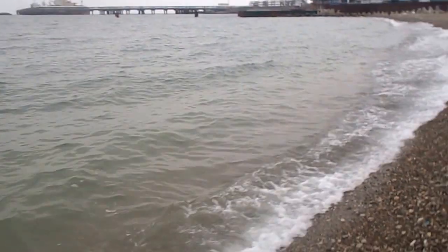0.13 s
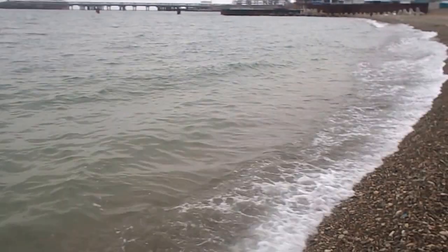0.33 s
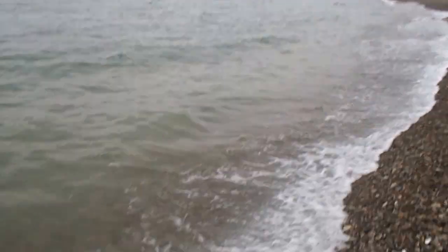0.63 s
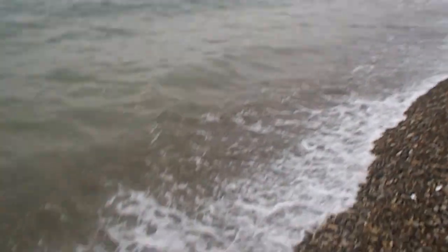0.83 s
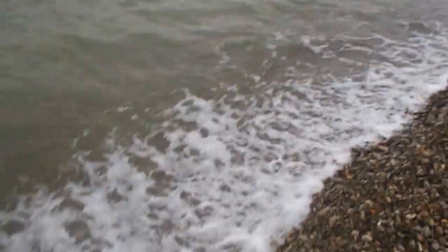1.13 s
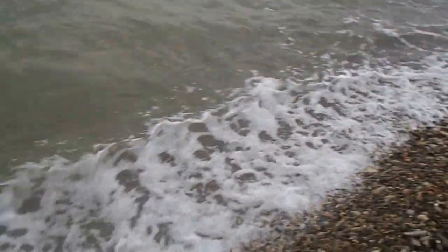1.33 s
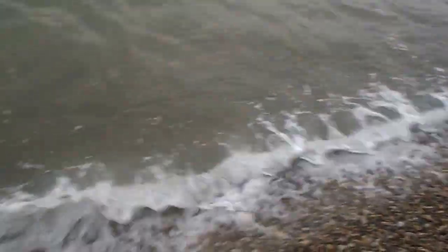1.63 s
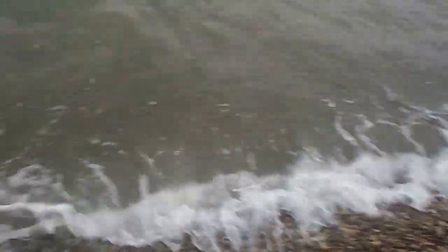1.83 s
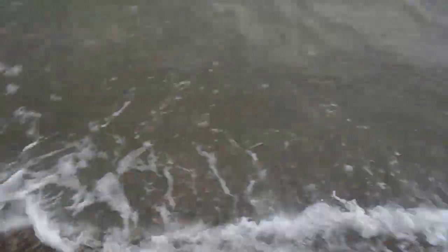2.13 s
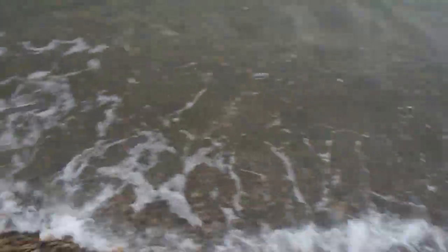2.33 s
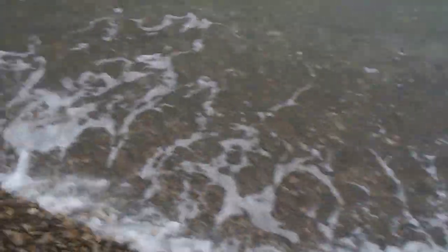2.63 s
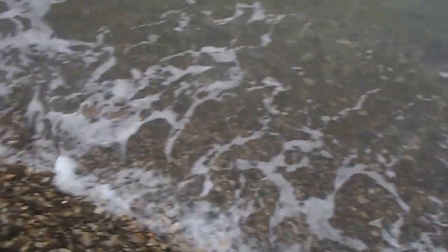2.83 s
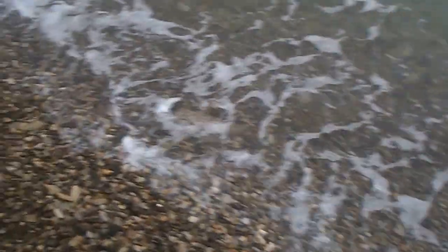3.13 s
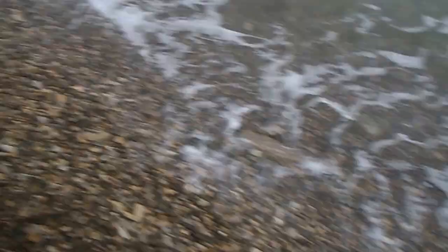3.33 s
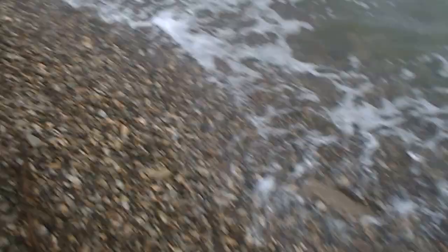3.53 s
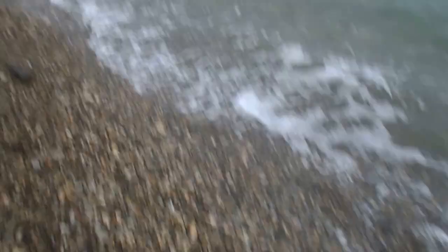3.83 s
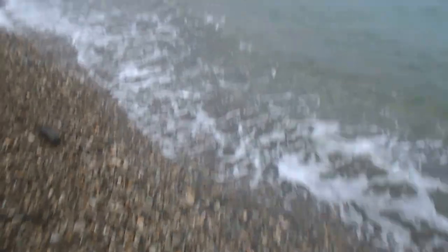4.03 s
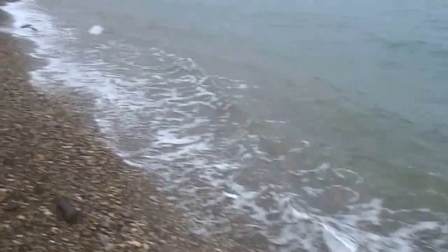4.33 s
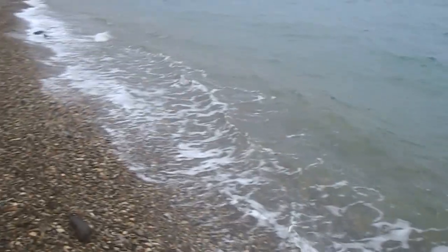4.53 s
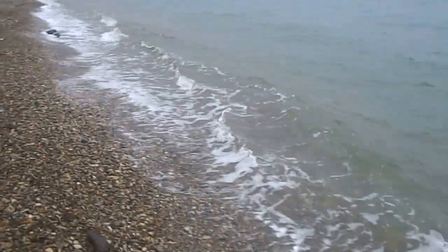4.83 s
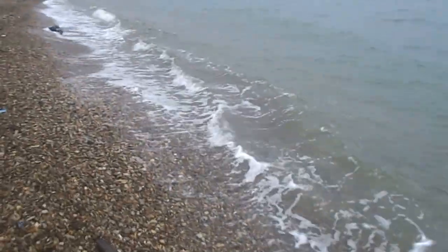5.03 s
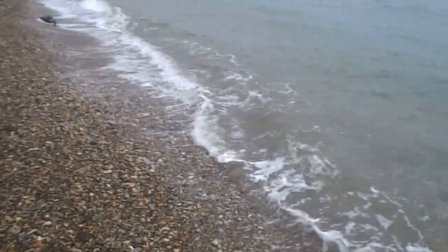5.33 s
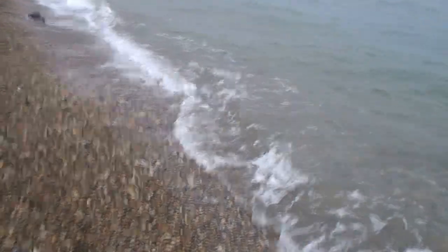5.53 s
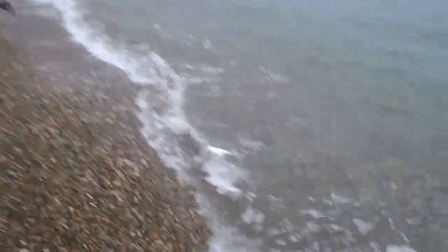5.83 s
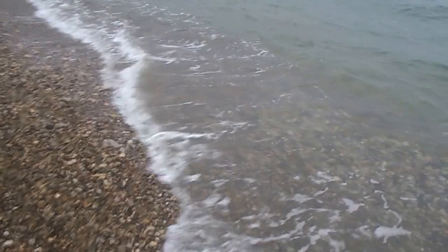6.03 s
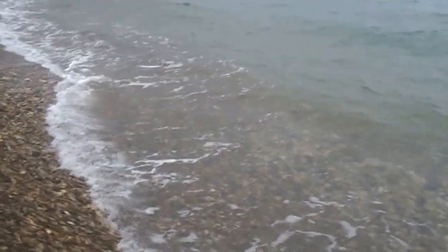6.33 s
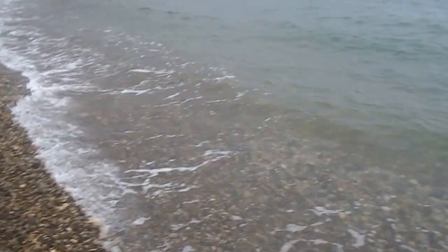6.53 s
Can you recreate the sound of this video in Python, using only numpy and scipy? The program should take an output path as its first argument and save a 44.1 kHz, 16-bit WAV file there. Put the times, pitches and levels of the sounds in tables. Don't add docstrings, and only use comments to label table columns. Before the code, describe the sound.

Close surf on shingle, outdoors: a splashing wash with low wind buffets first, then a quieter lull of foam hiss, gurgles and pebble ticks. Deep glugs mark the backwash, wind rumble returns, and a fresh wave crashes with a sharp clatter of stones before easing. Dry, nearly mono sound from a small camera microphone.

```python
import sys
import numpy as np
from scipy import signal
from scipy.fft import rfft, irfft
from scipy.io import wavfile
from scipy.ndimage import uniform_filter1d

SR = 44100
rng = np.random.default_rng(int(sys.argv[2]) if len(sys.argv) > 2 else 0)


def decibels_to_gain(level_db):
    exponent = np.asarray(level_db, float) / 20
    return 10 ** exponent


def transcribe(u):
    v = np.clip(np.atleast_2d(u).T, -1, 1)
    q = np.round(v * 32767).astype(np.int16)
    wavfile.write(sys.argv[1], SR, q)


N = 294588

# frequency_hz, level_db
SPRAY = [(5000, -33), (6800, -1.5), (7700, -0.5), (9300, -4), (10700, 3), (11200, -7), (11500, -16),
         (11800, -30)]


def evened(x):
    return x / np.sqrt(np.mean(x ** 2) + 1e-20)


def add(mix, s, sound):
    part = mix[max(round(s * SR), 0):][:len(sound)]
    part += sound[:len(part)]


def add_centred(mix, s, sound):
    half = len(sound) // 2
    add(mix, s - half / SR, sound[max(half - round(s * SR), 0):])


def column(rows, index):
    rows = np.array(rows)
    return np.interp(np.arange(N) / SR, rows[:, 0], rows[:, index])


def coloured(x, points):
    f, db = np.transpose(points)
    hz = np.fft.rfftfreq(len(x), 1 / SR)
    gain = decibels_to_gain(np.interp(np.log(hz + 1), np.log(f), db, -120, -120))
    return evened(irfft(rfft(x) * gain, len(x)))


def gliding(x, points, factor, size=512):
    f, db = np.transpose(points)
    hz, t, z = signal.stft(x, SR, nperseg=size)
    stretch = np.clip(np.interp(t, np.arange(N) / SR, factor), .4, 2.5)
    gain = decibels_to_gain(np.interp(np.log(hz[:, None] / stretch + 1), np.log(f), db))
    filtered = signal.istft(z * gain, SR, nperseg=size)[1][:N]
    level = np.sqrt((gain[hz < 6000] ** 2).mean(0))
    return filtered / np.interp(np.arange(N) / SR, t, level)


def flutter(top_hz):
    return coloured(rng.standard_normal(N), [(3, 0), (top_hz, -12), (3 * top_hz, -60)])


def patchy(patch_db, size=512):
    frames = 4 * N // size + 5
    a, b, patches = rng.standard_normal((frames, size // 2 + 1, 3)).T
    patches = uniform_filter1d(patches, size=6, axis=0)
    patches = evened(uniform_filter1d(patches, size=16, axis=1))
    z = (a + 1j * b) * decibels_to_gain(patch_db * patches)
    return evened(signal.istft(z, nperseg=size, noverlap=3 * size // 4)[1][:N])


def pops(per_s, spread_db):
    size_db = spread_db * np.minimum(rng.exponential(1, N), 4.2)
    clicks = decibels_to_gain(size_db) * rng.choice([-1., 1.], N)
    return evened(clicks * (rng.random(N) < per_s / SR))


def ring(hz, t60, glide, rise):
    t = np.arange(int(max(t60, .005) * SR)) / SR
    tone = np.sin(2 * np.pi * hz * (t + glide * t ** 2 / t60))
    return tone * decibels_to_gain(-60 * t / t60) * (1 - np.exp(-t / rise))


def froth(per_s, low_hz, high_hz, cycles, count=16):
    out, births, kind = np.zeros(N), pops(per_s, 1.95), rng.integers(0, count, N)
    for k, hz in enumerate(np.geomspace(low_hz, high_hz, count)):
        bubble = ring(hz, 2 * cycles / hz, 0.23, .5 / hz)
        bubble = evened(bubble) / np.sqrt(len(bubble))
        out += signal.oaconvolve(births * (kind == k), bubble)[:N]
    return evened(out)


def echoed(x):
    # time_s, first_notch_hz, share
    slope_echo = [
        (0, 2300, 0.018),
        (2.4, 2280, 0.017),
        (2.8, 2020, 0.12),
        (3.3, 2080, 0.2),
        (4.0, 2230, 0.27),
        (4.45, 2680, 0.064),
        (4.7, 2806, 0.019),
        (6.68, 2810, 0.022),
    ]
    share = np.clip(column(slope_echo, index=2), 0, .9)
    late = np.interp(np.arange(N) - SR / column(slope_echo, index=1), np.arange(N), x)
    return (x - share * late) / np.sqrt(1 + share ** 2)


def surf():
    # time_s, force_db, foam_db (re force), trapped_air_db (re force),
    # bubble_pitch_factor, air_pocket_pitch_factor
    water = [(0.0, -22, 0.5, -8.5, 0.84, 0.87), (.45, -24, -1.5, -8, 0.8, 0.87),
             (.91, -22.5, -8.5, -9.5, 1.11, 0.99), (1.1, -27.5, -6, -2.5, 1.07, 1.15),
             (1.42, -31.5, -1, -3, 0.95, 1.24), (1.78, -31, 6.5, -4.5, 1.16, 0.99),
             (2.12, -27, -2.5, -1.5, 0.86, 1.02), (2.46, -33.5, -2, -9, 1, 0.76),
             (2.86, -37, 5, -1, 0.94, 0.99), (3.18, -36, 6, 0, 0.89, 1.2),
             (3.45, -32.5, 3, 2.5, 0.81, 0.88), (4.05, -31, 2.5, 3, 0.99, 1.06),
             (4.28, -26.5, 5, -4, 0.85, 0.55), (4.61, -33, -0.6, 2, 0.76, 1.12),
             (5.15, -30.5, -1, -2.5, 0.85, 1.065), (5.9, -22.5, -1, -8.5, 1.07, 1.05),
             (6.17, -27.5, -6, -9.5, 1.1, 0.92), (6.68, -31, -1.5, -7, 1, 1.5)]
    # time_s, finest_mist_db
    mist_curve = [(0, 0.5), (.9, -2), (1.3, -1), (1.75, -3), (2.2, 2.5), (2.9, -2.5), (3.45, -1.5),
                  (4.1, -0.5), (4.75, -2.5), (5.0, 3), (5.45, 1), (5.56, 6.5), (5.9, 1), (6.0, -4),
                  (6.2, 7), (6.68, 0)]
    # frequency_hz, level_db
    gurgle_spectrum = [(40, -45), (120, -44), (280, -5), (500, -2.5), (800, -5), (1300, -19.5),
                       (3000, -39.5)]
    roar_spectrum = [(200, -47), (650, -8), (1000, -5), (1400, -4), (2000, -5), (3200, -9.5), (7000, -29.5)]
    fizz_spectrum = [(700, -15.5), (1800, -6.5), (2600, -5), (3400, -5), (5000, -4), (9000, -2.5)]
    fizz_rolloff = [(100, -1.5), (4300, -2), (5500, -6.5), (6500, -13.5), (7300, -31), (8000, -42)]

    shared = flutter(106)
    force_db, foam_db, air_db = (column(water, index=i) for i in (1, 2, 3))
    fine = np.clip(column(water, index=4), .5, 2)
    pocket = column(water, index=5)

    gurgle = patchy(2.6, size=1024) + 0.32 * froth(900, 202.2, 1414, 5.0)
    gurgle = evened(gliding(gurgle, gurgle_spectrum, pocket, size=1024))
    roar = patchy(2.34) + .5 * froth(3000, 620.0, 5030, 9.2)
    roar = evened(gliding(roar, roar_spectrum, fine))

    crackle = pops(2500, 3.8)
    fizz_pitch = 1 + 0.35 * foam_db
    fizz = gliding(patchy(1.2) + 0.67 * crackle, fizz_spectrum, fizz_pitch)
    fizz = coloured(fizz, fizz_rolloff)

    spray = coloured(patchy(1.6) + .8 * crackle, SPRAY)
    mist = irfft(rfft(spray) * (np.fft.rfftfreq(N, 1 / SR) > 10000), N)
    spray = spray + (decibels_to_gain(column(mist_curve, index=1)) - 1) * mist
    spray_db = -42.5 + 1.27 * (force_db + 28) + 1.16 * foam_db

    reflected = decibels_to_gain(force_db + 0.11 * shared) * roar
    reflected = reflected + decibels_to_gain(force_db + foam_db + 0.78 * shared) * fizz
    return (decibels_to_gain(force_db + air_db + 0.46 * shared) * gurgle
            + echoed(reflected)
            + decibels_to_gain(spray_db + 1.8 * shared) * spray)


def stones():
    # start_s, peak_db, pitch_hz, spray_db (relative)
    impacts = [(1.0184, -14, 4460, -29), (1.0524, -18, 3200, -29), (1.056, -14, 4800, -24),
               (1.0678, -16.5, 4040, -19), (1.123, -15, 4500, -33), (1.1304, -22, 5360, -27),
               (1.1744, -18, 4500, -30), (1.3326, -25, 3390, -15), (.924, -20, 4730, -30),
               (1.212, -32, 4700, -28), (1.265, -33, 4900, -28), (1.344, -23, 4670, -28),
               (1.8325, -23, 4410, -31), (1.899, -17, 3060, -16), (2.2642, -13.5, 3650, -19),
               (2.3085, -16.5, 4740, -32), (2.3553, -24, 2950, -22), (2.5942, -21, 4190, -30),
               (2.6094, -20, 3800, -26), (2.658, -20, 4500, -26), (3.354, -16, 3540, -16),
               (3.384, -18, 3690, -25), (3.3992, -22, 3700, -21), (3.407, -12, 3930, -26),
               (4.9272, -26, 4250, -13), (6.2664, -10, 4070, -22), (6.2924, -10, 3860, -23),
               (6.309, -12, 4400, -16)]
    out, t = np.zeros(N), np.arange(4096) / SR
    t60_s, rise_s = 0.02, 0.0019
    for s, db, hz, rel_db in impacts:
        noise = rng.standard_normal(4096)
        clack = coloured(noise, [(.5 * hz, -30), (.8 * hz, -8), (.92 * hz, -1),
                                 (1.08 * hz, -1), (1.25 * hz, -12), (1.6 * hz, -34)])
        spit = decibels_to_gain(rel_db + 7.5) * coloured(noise, SPRAY)
        envelope = decibels_to_gain(db - 3.0 - 60 * t / t60_s) * (1 - np.exp(-t / rise_s)) ** 2
        add(out, s, envelope * 2 * (clack + spit))
    return out


def raked_stones():
    # peak_s, level_db, rise_s, fall_t60_s
    handfuls = [(2.15, -30.5, .06, 0.49), (2.594, -22.5, 0.024, 0.36), (2.672, -26.5, 0.015, 0.23),
                (3.405, -26, 0.024, 0.14), (3.52, -30, 0.06, 0.4), (4.21, -39, 0.012, 1),
                (4.36, -27.5, 0.082, 0.74), (4.932, -24.5, 0.013, 0.18), (4.962, -24.5, 0.019, 0.19),
                (5.258, -30, 0.032, 0.21), (6.256, -27, 0.006, 0.45), (6.296, -25.5, 0.0091, 0.17),
                (6.314, -26, 0.0048, 0.39), (6.268, -28, .004, .08), (4.43, -35.5, .04, 0.26),
                (1.125, -32, .002, .04), (2.268, -33, .003, .05), (5.88, -36, .04, 0.25),
                (0.61, -28, 0.04, 0.56), (3.2, -34.5, .06, .8), (5.17, -35, 0.047, .5),
                (5.64, -25.5, 0.083, 1.8), (6.36, -31, .03, 1.6), (0.095, -23.5, .06, 0.67)]
    # frequency_hz, level_db
    grit_spectrum = [(300, -9), (1000, -2.5), (2500, -3), (4200, 0), (5500, -1), (6600, -6.5),
                     (7700, -13.5), (10700, -14), (11500, -26), (11800, -70)]
    t, heap = np.arange(N) / SR, np.zeros(N)
    for s, db, rise, t60 in handfuls:
        rise_db = -8.7 * np.minimum((t - s) / rise, 9) ** 2
        fall_db = -60 * (t - s) / t60
        heap += decibels_to_gain(db + np.where(t < s, rise_db, fall_db).clip(-150))
    grit = coloured(rng.standard_normal(N) + 0.64 * pops(2500, 3.0), grit_spectrum)
    return heap * decibels_to_gain(1.84 * flutter(70)) * echoed(grit)


def bubbles():
    # start_s, peak_db, pitch_hz
    air_pockets = [(0.35, -11, 1196), (.419, -12, 1140), (.549, -9, 1100), (.871, -13, 1430),
                   (1.832, -15, 2100), (1.92, -14, 415), (2.063, -11, 700), (2.092, -16, 605),
                   (2.194, -13, 596), (3.247, -12, 620), (3.32, -10, 884), (3.389, -10.5, 560),
                   (3.505, -11.5, 1180), (3.639, -8, 413), (5.131, -15, 680),
                   (2.0368, -14, 2987),
        (2.1294, -16, 3630),
        (2.1919, -19, 1620),
        (2.244, -14, 1690),
                   (0.6194, -18, 1360),
        (0.685, -13, 1870),
        (0.7594, -15, 1350),
        (0.82, -11, 1650),
        (0.9294, -24, 1630),
        (5.811, -12, 1690),
        (5.8794, -11, 1570),
        (5.9294, -17, 1650),
                   (3.673, -16, 670),
        (3.846, -29, 482),
        (3.895, -12, 308),
        (4.046, -14, 695),
    ]
    out = np.zeros(N)
    for s, db, hz in air_pockets:
        add(out, s, decibels_to_gain(db - 3.0) * ring(hz, 0.038, 0.055, 0.0021))
    return out


def drops():
    # start_s, peak_db, pitch_hz
    pings = [(.269, -13, 2930), (.272, -19, 4170), (.433, -20, 2580), (.787, -22, 5510), (.91, -21, 5600),
             (1.131, -23, 5355), (1.174, -23, 4650), (1.211, -33, 5170), (1.264, -32, 5270),
             (1.398, -26, 4480), (1.469, -23, 4850), (1.578, -22, 4820), (1.769, -21, 4940),
             (2.074, -22, 3820), (2.181, -26, 5320), (2.191, -18, 3600), (2.215, -23, 4130),
             (2.265, -21, 3960), (2.316, -22, 3790), (2.353, -27, 5010), (2.583, -20, 5690),
             (2.594, -16, 4130), (2.957, -26, 3270), (3.002, -26, 3270), (3.215, -19, 4345),
             (3.287, -20, 2760), (3.59, -15, 3250), (3.899, -16, 3100), (4.276, -14, 3122),
             (4.421, -22, 5690), (4.472, -26, 5360), (4.634, -25, 3790), (4.807, -28, 4480),
             (4.876, -27, 3620), (4.932, -18, 5910), (5.052, -28, 3790), (5.09, -26, 4500),
             (5.622, -22, 5860), (6.107, -21, 3100), (6.296, -15, 4100), (6.313, -16, 4250),
             (6.268, -17, 3180), (1.068, -20, 3900), (6.639, -20, 4130)]
    out = np.zeros(N)
    for s, db, hz in pings:
        add(out, s, decibels_to_gain(db) * ring(hz, 0.02, 0.034, 0.00057))
    return out


def splashes():
    # centre_s, level_db, pitch_hz, half_length_s
    splash_bursts = [(0.075, -31, 780, .03), (.185, -26, 850, 0.023), (.37, -31, 1150, .025),
                     (0.76, -31.5, 4100, .03), (.85, -29, 1400, 0.042), (2.13, -26.5, 2450, .015),
                     (2.332, -33, 1350, .03), (2.49, -37, 510, 0.072), (2.953, -38, 2700, .06),
                     (3.07, -42, 2000, .05), (3.572, -34, 1330, .05), (3.556, -33, 2750, .06),
                     (3.698, -36, 430, .05), (3.841, -34, 2800, 0.089), (3.827, -36, 1450, 0.044),
                     (4.271, -35, 3000, .05), (4.793, -37.5, 1900, 0.08), (5.26, -29, 3200, 0.03),
                     (5.399, -36, 3100, .03), (5.54, -34, 340, .025), (5.801, -31, 4200, .07),
                     (5.882, -34, 1700, .04), (6.298, -34, 4000, 0.022), (6.343, -33, 910, 0.036),
                     (6.4, -31, 1000, .03), (6.557, -37, 900, 0.048), (6.154, -35, 220, 0.023),
                     (6.58, -37.5, 160, .04), (3.405, -24, 4500, .007), (6.27, -30, 2000, .008),
                     (6.295, -32, 1640, .012), (6.315, -34, 3300, .012), (.1, -33, 390, 0.085),
                     (.06, -34, 270, .06), (0.232, -28, 2200, .015), (1.0, -39, 500, 0.063), (2.9, -34, 500, .04),
                     (3.8, -36, 320, 0.11), (4.42, -36, 146, 0.05), (3.9, -35, 4600, .07), (4.2, -37, 3100, .04),
                     (5.4, -32, 2300, .03), (6.1, -32.5, 246, .04), (2.0, -38.5, 169, .1), (2.7, -40, 200, .05),
                     (1.06, -32, 5000, .01), (.76, -41, 70, .03), (4.0, -38, 380, .04), (5.45, -33, 270, .025),
                     (3.1, -40, 230, .04),
                     (3.408, -24, 4400, .003), (3.387, -28, 3800, .005), (3.407, -25, 750, .004),
             (6.252, -29, 4500, .004), (6.281, -25, 4300, .007), (6.283, -27, 1700, .008),
             (6.316, -24, 3900, .007), (6.343, -26, 4300, .004), (1.897, -29, 1200, .006),
             (1.837, -27, 1900, .006), (2.193, -28, 3300, .004), (.205, -27, 1500, .012),
             (.2, -29, 3500, .015), (1.8, -33, 3000, .05), (6.3, -29, 4800, .02), (3.29, -35, 5500, .03),
             (2.07, -31, 290, .07), (1.935, -33, 650, .02), (.645, -27, 1050, .02), (.3, -28, 950, .015),
             (5.9, -33, 1900, .06), (6.12, -35, 105, .04), (5.64, -34, 105, .04), (3.265, -33, 800, .035),
             (.88, -32, 1850, .06), (3.88, -36, 450, .15), (3.555, -33, 4500, .012)]
    out, t = np.zeros(N), np.arange(-8192, 8192) / SR
    w = 1.2
    for s, db, hz, half in splash_bursts:
        band = coloured(rng.standard_normal(len(t)), [(hz / w ** 3, -40), (hz / w, -3), (hz, 0),
                                                      (hz * w, -3), (hz * w ** 3, -40)])
        add_centred(out, s, decibels_to_gain(db) * band * np.exp(-(t / half) ** 2))
    return out


def spits():
    # start_s, peak_db
    beads = [(1.7057, -34), (1.802, -31), (1.9691, -32), (2.1103, -34), (2.2221, -34), (2.5134, -42),
             (2.8955, -36), (3.0068, -41), (3.143, -38), (3.2318, -35), (3.2632, -29), (3.2911, -36),
             (3.4034, -28), (3.5455, -35), (3.613, -37), (4.1377, -34), (4.1981, -30), (4.3238, -31),
             (4.455, -32), (4.8975, -39), (5.2327, -30), (5.5709, -29), (6.1367, -34), (6.2514, -30)]
    out, t = np.zeros(N), np.arange(2048) / SR
    t60_s, rise_s = .014, .0004
    for s, db in beads:
        envelope = decibels_to_gain(db - 60 * t / t60_s) * (1 - np.exp(-t / rise_s))
        add(out, s, envelope * coloured(rng.standard_normal(len(t)), SPRAY))
    return out


def wind():
    # time_s, level_db, eddy_pitch_hz
    eddies = [(0.0, -27, 243), (.2, -28.5, 248.4), (.24, -38, 200), (.72, -36, 172), (.82, -40.5, 234.2),
              (1.45, -46.5, 226), (1.86, -37.5, 215.4), (2.08, -36.5, 241), (2.5, -45, 236.8),
              (3.5, -43, 242.4), (3.75, -35, 240), (4.0, -36, 225), (4.25, -35.5, 213.8),
              (4.48, -37, 189.8), (4.7, -37, 185), (5.6, -36, 189.9), (6.17, -39, 185), (6.68, -45, 174.8)]
    eddy_hz = column(eddies, index=2)
    carrier = np.exp(2j * np.pi * np.cumsum(eddy_hz) / SR)
    slow = [(.5, -8), (55, -4.5), (120, -12.5), (400, -48)]
    whirl = coloured(rng.standard_normal(N), slow) + 1j * coloured(rng.standard_normal(N), slow)
    rumble = coloured(rng.standard_normal(N), [(12, -45), (30, -18), (60, -7), (90, 1), (140, -4.0), (300, -44)])
    rumble_db = -18 - 0.25 * (eddy_hz - 208.4)
    level = decibels_to_gain(column(eddies, index=1) - 0.1 + 1.25 * flutter(48))
    return level * (evened((carrier * whirl).real) + decibels_to_gain(rumble_db) * rumble)


def buffets():
    # centre_s, peak_db, pitch_hz
    single_buffets = [(.069, -20, 262), (0.081, -13, 260), (0.139, -14, 324), (0.157, -17, 265),
                      (0.217, -10, 255), (.508, -9.5, 252), (0.589, -13, 198), (0.606, -17, 180),
                      (0.641, -19, 212), (.655, -16, 175), (.705, -17, 178), (.74, -22, 180),
                      (3.936, -14, 272), (4.253, -18, 230), (4.509, -17, 192), (4.524, -13.5, 195),
                      (4.682, -17.5, 188), (4.916, -13.5, 254), (4.929, -15, 172.6), (4.95, -12.5, 165),
                      (4.99, -13.5, 219), (5.616, -11, 270.6), (5.635, -16, 231), (5.655, -17, 206),
                      (5.671, -11.5, 234), (5.958, -18, 247), (5.979, -12, 287), (6.006, -15, 221),
                      (6.107, -20, 193), (6.152, -34, 181)]
    # centre_s, peak_db, pitch_hz, width_s
    puffs = [
        (.012, -23, 276, 0.028),
        (0.04, -28, 285, 0.0091),
        (.115, -31, 246, 0.015),
        (2.05, -26, 292, 0.014),
        (2.077, -20, 254, 0.0081),
        (2.11, -22.5, 294, 0.025),
        (3.694, -31, 294, .0062),
        (5.119, -17, 204, 0.0071),
        (5.493, -17.5, 130.2, 0.01),
        (5.78, -20, 122, .01),
    ]
    out, t = np.zeros(N), np.arange(-1024, 1024) / SR
    for s, db, hz, width in [(s, db, hz, 0.88 / hz) for s, db, hz in single_buffets] + puffs:
        sagging = hz * t * (1 - 0.065 * t / width)
        swing = np.cos(2 * np.pi * (sagging + rng.random())) * np.exp(-2.2 * (t / width) ** 2)
        add_centred(out, s, decibels_to_gain(db - 0.7) * swing)
    return out


def gusts():
    # start_s, length_s, level_db
    gust_lumps = [(0.009, 0.047, -34), (0.157, 0.184, -29.5), (0.378, 0.047, -26.5), (0.464, 0.09, -33),
                  (0.59, 0.2, -33), (4.162, 0.097, -30), (4.383, 0.18, -29), (4.619, 0.083, -37),
                  (4.888, 0.136, -27), (5.069, 0.15, -33), (5.443, 0.064, -29.5), (5.58, 0.11, -27),
                  (5.762, 0.089, -31), (5.949, 0.09, -28), (6.076, 0.1, -30), (6.438, 0.082, -33),
                  (3.584, 0.15, -39),
        (3.78, 0.086, -39),
        (3.885, 0.25, -38),
    ]
    # frequency_hz, level_db
    shove_spectrum = [(15, -40), (40, -18), (80, -3), (140, -1), (200, -2), (320, -24)]
    t, held, edge_s = np.arange(N) / SR, np.zeros(N), 0.019
    for s, length, db in gust_lumps:
        inside = np.minimum(t - s, s + length - t)
        held += decibels_to_gain(db) * np.clip(inside / edge_s + .5, 0, 1)
    return held * decibels_to_gain(-4.5 + 2.8 * flutter(40)) * coloured(rng.standard_normal(N), shove_spectrum)


def side_hiss():
    # centre_s, low_hz, high_hz, side_db
    bands = [
        (1.63, 6900, 8940, -53),
        (2.77, 5680, 7500, -49),
        (3.745, 6260, 7600, -56),
        (3.745, 4230, 5270, -38),
        (3.88, 4200, 5170, -36),
        (4.19, 4200, 5160, -38),
    ]
    side = np.zeros(N)
    for s, low_hz, high_hz, db in bands:
        band = [(.98 * low_hz, -60), (low_hz, 0), (high_hz, 0), (1.02 * high_hz, -60)]
        hiss = coloured(rng.standard_normal(2048), band)
        add_centred(side, s, decibels_to_gain(db) * hiss * signal.windows.hann(2048))
    return side


def scene():
    water = surf() + stones() + raked_stones() + bubbles() + drops() + splashes() + spits()
    return np.tile(water + wind() + buffets() + gusts(), (2, 1))


def band_limit(x):
    return signal.sosfilt(signal.butter(12, 11810, fs=SR, output="sos"), x)


def record(dry):
    # start_s, dip_db, recovery_s
    grabs = [
        (0.219, -6, 0.03),
        (4.53, 0.5, .06),
    ]
    t, hz = np.arange(N) / SR, np.fft.rfftfreq(N, 1 / SR)
    dip_db = np.zeros(N)
    for s, db, back in grabs:
        dip_db += db * np.exp(-(np.maximum(t - s, 0) / back) ** 2) * (t > s)
    response = np.clip((11660 - hz) / 450, 0, 1) ** 1.5
    for notch_hz in (6998, 8495, 9997):
        response = response * (hz - notch_hz) / np.hypot(hz - notch_hz, 550)
    x = irfft(rfft(dry * decibels_to_gain(uniform_filter1d(dip_db, size=60))) * response, N)
    mix = x + side_hiss() * np.array([[1], [-1]])
    return band_limit(mix)


dry = scene()
out = record(dry)
transcribe(out)
```